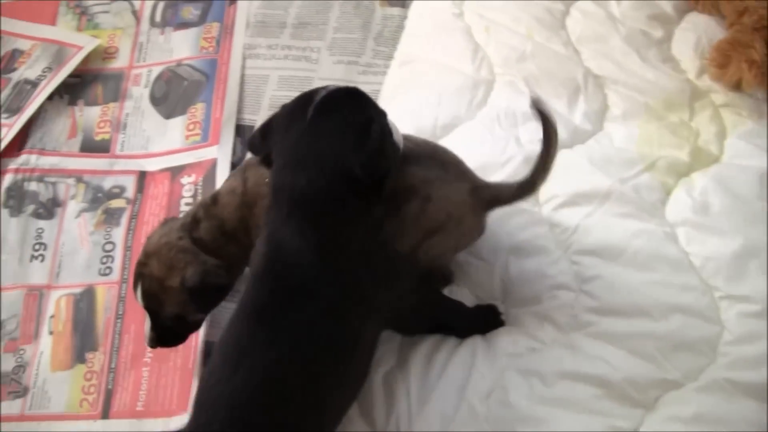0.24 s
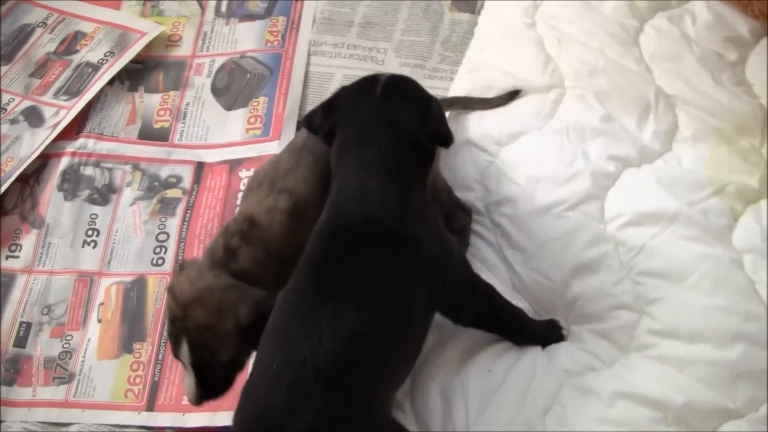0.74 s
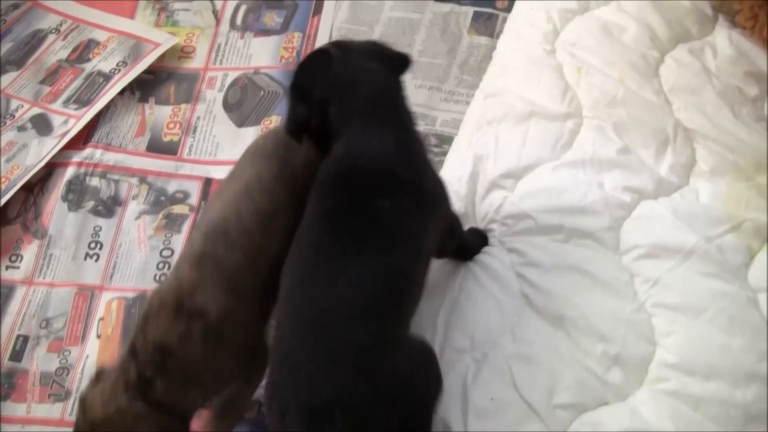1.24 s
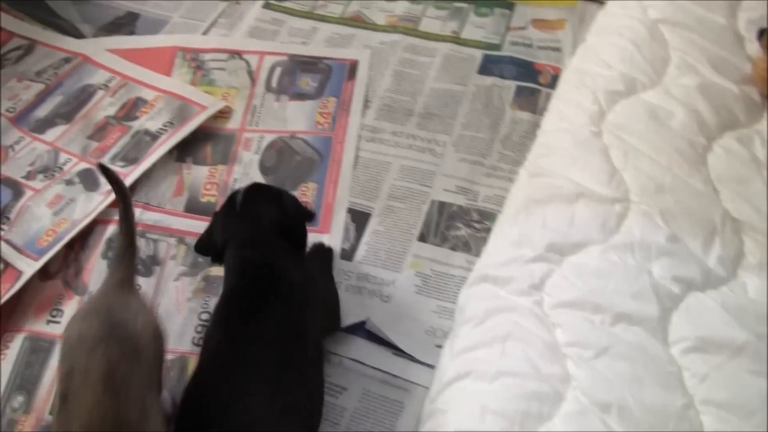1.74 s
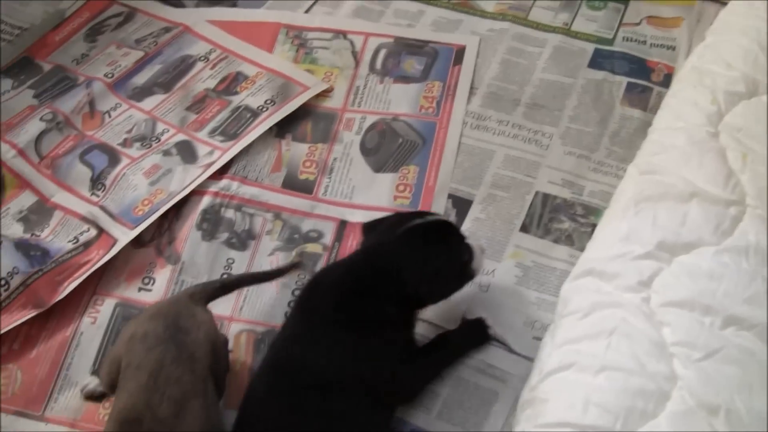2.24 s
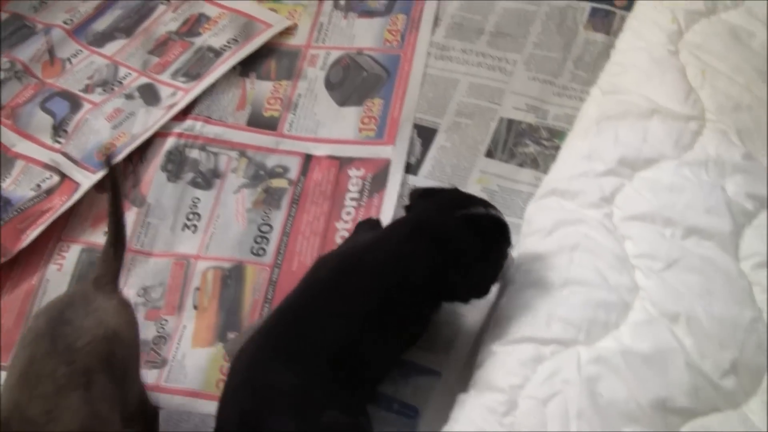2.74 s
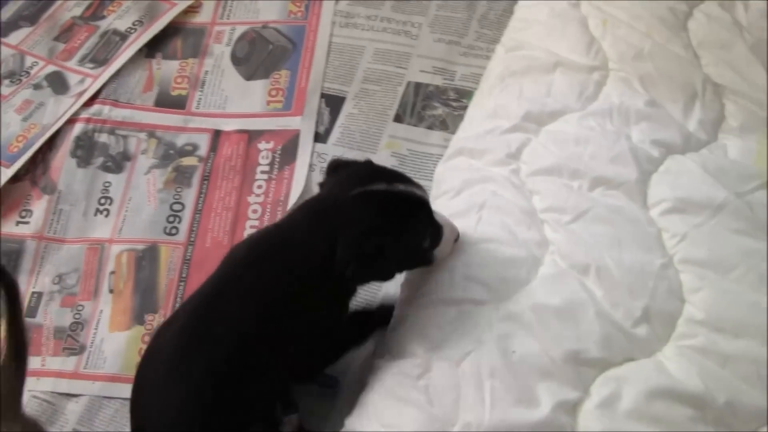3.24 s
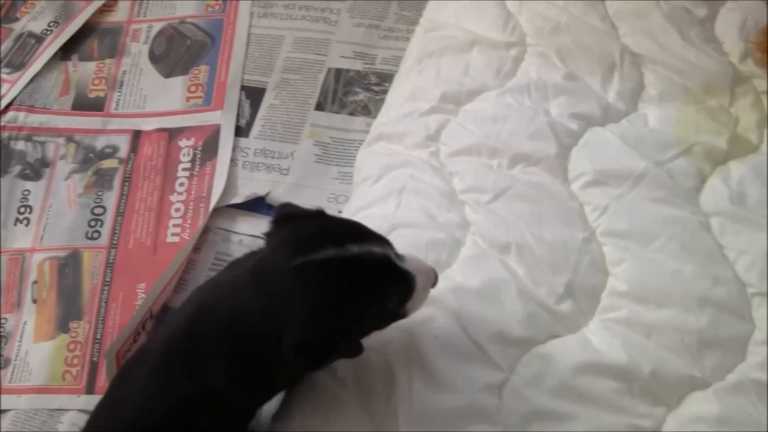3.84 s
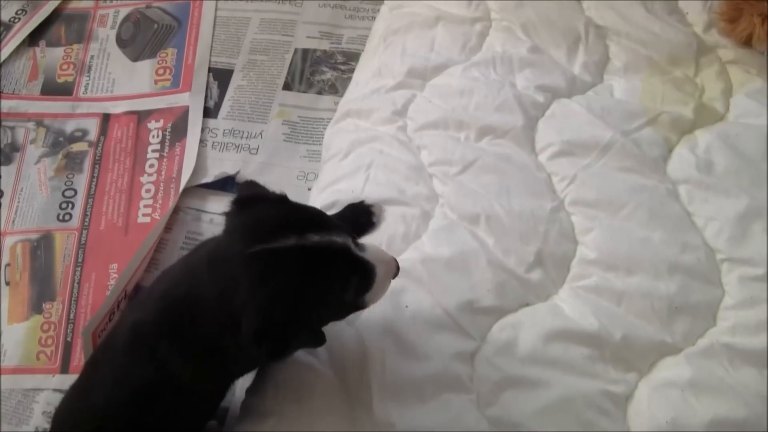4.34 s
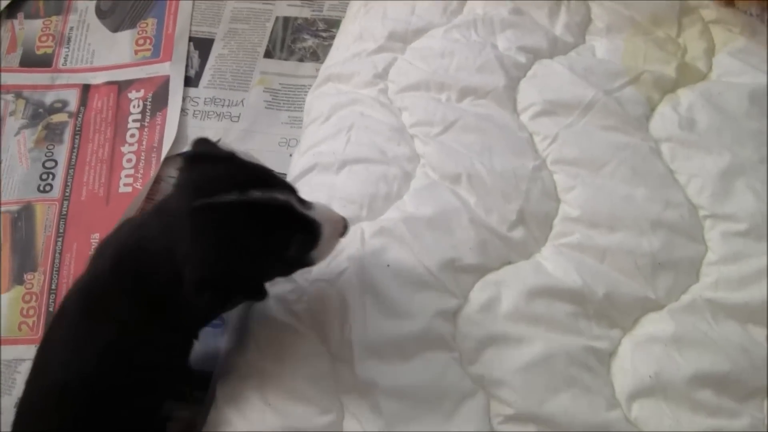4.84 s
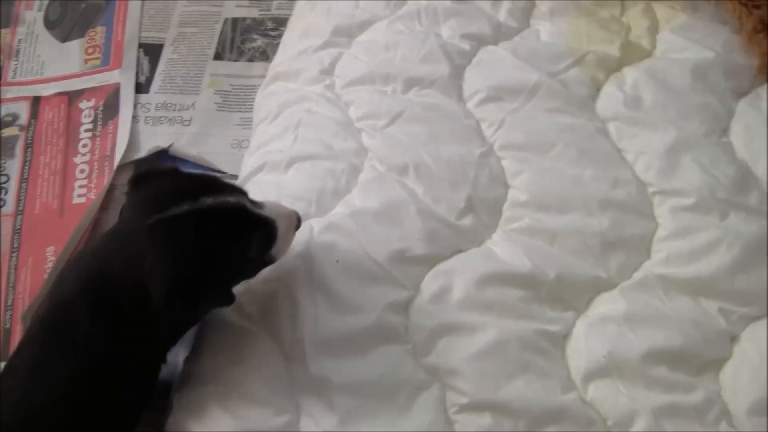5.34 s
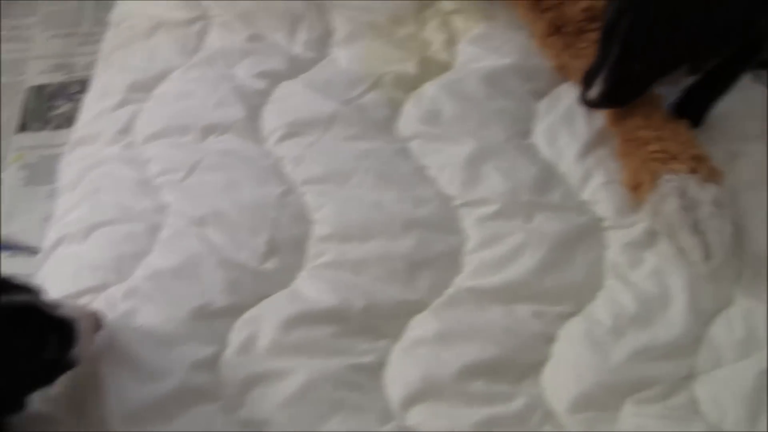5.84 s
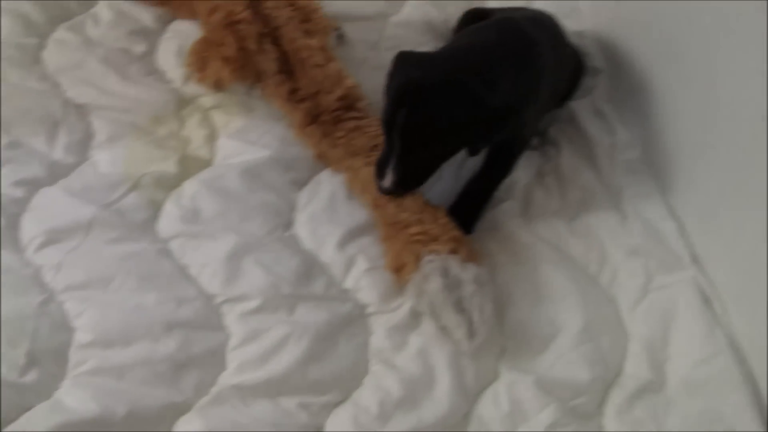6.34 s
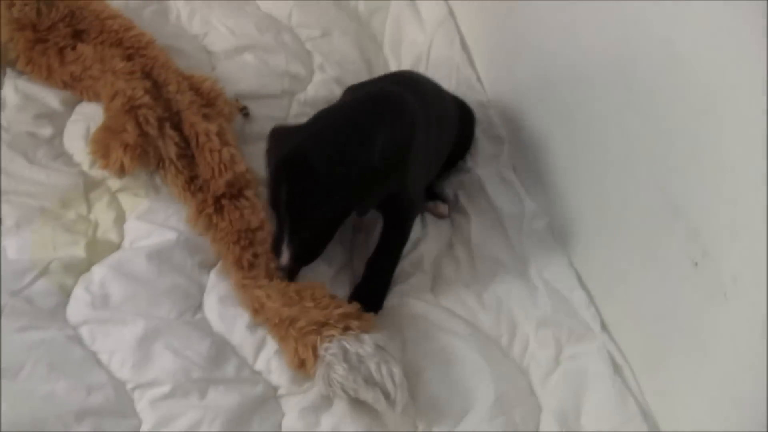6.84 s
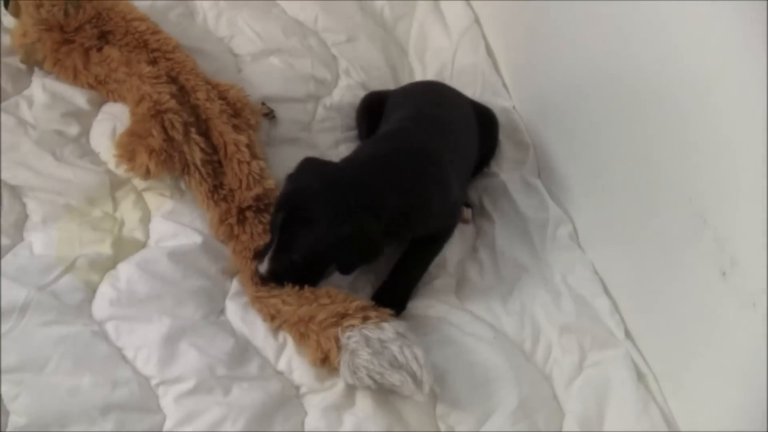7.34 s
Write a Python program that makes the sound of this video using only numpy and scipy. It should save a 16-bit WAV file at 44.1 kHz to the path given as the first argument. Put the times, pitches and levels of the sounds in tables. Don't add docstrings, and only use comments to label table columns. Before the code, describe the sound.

Close crinkling and dragging of newspaper under small paws, a burst of sharp snaps and thuds early, then sparse rustles, taps and pops.

```python
import sys
import numpy as np
from scipy import signal
from scipy.fft import rfft, irfft, next_fast_len
from scipy.io import wavfile
from scipy.ndimage import uniform_filter1d

SR = 44100
rng = np.random.default_rng(int(sys.argv[2]) if len(sys.argv) > 2 else 0)


def generate_wav(sig):
    pcm = np.round(np.clip(np.atleast_2d(sig).T, -1, 1) * 32767).astype(np.int16)
    wavfile.write(sys.argv[1], SR, pcm)


def invert_db(level):
    return 10 ** (np.asarray(level, dtype=float) / 20)


N = 334719


def level(x, db):
    return x * invert_db(db) / np.sqrt(np.mean(x ** 2))


def steady(x, shape):
    return x * np.sqrt(np.sum(shape ** 2) / np.sum(x ** 2))


def colour(x, points):
    size = next_fast_len(len(x))
    hz, db = np.transpose(points)
    bin_hz = np.fft.rfftfreq(size, 1 / SR)
    gain = invert_db(np.interp(np.log(bin_hz + 1), np.log(hz), db))
    return irfft(rfft(x, size) * gain, size)[:len(x)]


def resonate(x, hz, q):
    b, a = signal.iirpeak(min(hz, 0.4 * SR), q, fs=SR)
    return signal.lfilter(b, a, x)


def resonate_twice(x, hz, q):
    return resonate(resonate(x, hz, q), hz, q)


def walk(rate_hz):
    hold = int(SR / rate_hz)
    steps = np.repeat(rng.standard_normal(N // hold + 1), hold)
    return 1.2 * uniform_filter1d(steps, hold)[:N]


def add(track, x, time_s):
    paths = rng.standard_normal(256) * np.exp(-np.arange(256) / 60)
    paths /= np.sqrt(np.sum(paths ** 2))
    i = int(time_s * SR)
    track[0, i:i + len(x)] += x[:N - i]
    track[1, i:i + len(x)] += signal.lfilter(paths, [1], x)[:N - i]


def grains(size, per_s, spread_db, smear_s):
    struck = rng.random(size) < per_s / SR
    kicks = struck * invert_db(spread_db * rng.exponential(size=size))
    return signal.lfilter([1], [1, -np.exp(-1 / (smear_s * SR))], kicks)


# (frequency [Hz], density [dB per Hz])
ROOM_MID = [(15, -53), (25, -12), (283, 6), (473, 1.5), (653, 3.5), (1970, -7), (4680, -17), (9690, -16),
            (12000, -19.5), (14200, -8), (15800, -9.5)]
ROOM_SIDE = [(15, -68), (25, -24), (64, -21), (261, 2), (381, 3.5), (527, 2.5), (789, -0.5), (1630, -8.5),
             (4680, -23), (5970, -41), (11100, -20), (13800, -32), (15800, -50)]


def room_noise():
    rows = []
    for points, db in ((ROOM_MID, -48), (ROOM_SIDE, -43)):
        hiss = level(colour(rng.standard_normal(N), points), db)
        rows.append(hiss * invert_db(0.11 * walk(2.44)))
    return np.array(rows)


def walls():
    low_t60_s, high_t60_s, rise_s = 0.36, 0.16, 0.0022
    t = np.arange(SR // 2) / SR
    noise = rng.standard_normal(len(t)) * np.minimum(t / rise_s, 1)
    low = signal.lfilter(*signal.butter(2, 3200, fs=SR), noise)
    tail = low * invert_db(-60 * t / low_t60_s) + (noise - low) * invert_db(-60 * t / high_t60_s)
    return tail / np.sqrt(np.sum(tail ** 2))


# (frequency [Hz], gain [dB])
SHEET = [(250, -12), (520, -2), (760, 2.5), (1100, 1.5), (1600, 2.5), (2500, 1), (3500, -5), (5000, -23),
         (9000, -36.5)]
SCRAPE = [(2000, -20), (3500, -7.5), (5000, -3.5), (7000, -6), (9000, -12.5), (14000, -50)]
FINE = [(4000, -34), (7000, -12), (9000, -4), (11000, -4), (14000, -7.5), (16000, -18)]
PADDING = [(60, -42), (100, -13), (200, 4.5), (350, 11), (550, 1), (900, -11), (2000, -49)]
# (time [s], paper effort [dB], dryness [dB], weight on duvet [dB])
STIRRING = [(0, -46.5, -4.5, -47), (.2, -47, -13.5, -56), (.75, -52.5, -11, -51), (1.24, -53, -2.5, -49),
            (1.47, -45, -4, -45), (1.66, -41, -18, -41), (1.85, -39, -4.5, -75), (2.3, -53, 2.5, -69),
            (2.9, -54, 3, -64), (3.42, -43.5, 1, -58), (3.7, -48.5, -9.5, -59), (4.3, -52, -8, -53),
            (4.6, -56, -18, -54), (5.32, -54.5, -26, -64), (5.8, -62, 2, -54), (6.2, -48, -10, -57.5),
            (7.22, -51.5, -10, -53.5), (7.59, -47, -19, -60)]
# (middle [s], length [s], effort [dB], dryness [dB])
SLIDES = [(0.303, 0.21, -41, -5), (0.613, 0.27, -43, -8.5), (0.966, 0.26, -39.5, -6.5),
          (1.106, 0.063, -31, -14), (1.36, 0.3, -43.5, -5.5), (1.49, 0.092, -37, 10),
          (1.635, 0.074, -34, 1), (1.69, 0.21, -31.5, -4), (1.842, 0.14, -51.5, 16.5),
          (1.995, 0.15, -36.5, -15), (2.116, 0.4, -43.5, -3.5), (2.453, 0.24, -54, -18),
          (2.597, 0.36, -49, -27), (2.807, 0.31, -40.5, -5.5), (3.27, 0.22, -48.5, 12.5),
          (3.323, 0.15, -40, -17), (3.583, 0.18, -56, 14), (3.811, 0.24, -36.5, -4),
          (4.493, 0.23, -49, -4.5), (4.68, 0.15, -45.5, -14), (4.887, 0.43, -48, -3.5),
          (5.176, 0.48, -50, -6.5), (5.468, 0.2, -43.5, -8), (5.61, 0.23, -41, -8.5),
          (5.855, 0.32, -41.5, -11), (6.015, 0.14, -46, -2), (6.394, 0.15, -45.5, -3.5),
          (6.973, 0.21, -43, -7.5), (7.348, 0.23, -50, -1.5), (7.535, 0.1, -45.5, 3.5),
          (0.895, 0.022, -37, -14), (1.302, 0.037, -35, -6), (1.578, .025, -38, 0),
          (1.71, 0.022, -37, 10.5), (6.344, 0.04, -41.5, -2.5), (6.398, .04, -43.5, -2),
          (6.474, 0.018, -44, 10), (6.496, 0.074, -40.5, -2), (6.772, 0.038, -41, -9),
          (3.325, .03, -39.5, -7), (2.747, .02, -49, 9), (4.148, 0.049, -52, 3), (1.146, .04, -41, -5),
          (7.15, .04, -57, -13), (3.624, 0.039, -35, -14)]
# (middle [s], effort [dB], dryness [dB])
NUDGES = [(.03, -60, -13), (.82, -45, -12), (1.17, -43, -12), (3.03, -62, -8), (4.05, -53, -8),
          (4.22, -62, -28), (4.39, -50, -3.5), (5.07, -54, 0), (5.75, -43.5, -29), (6.33, -47, -22),
          (6.58, -43, -25), (6.84, -43.5, -13), (7.1, -46.5, -17)]


def rustle():
    scrape_db, scrape_per_dryness, nudge_s = -1, 0.7, 0.11
    t = np.arange(N) / SR

    def layers_db(effort, dry, weight):
        return np.array([effort, effort + scrape_db + scrape_per_dryness * dry, effort + dry, weight])

    time_s, *controls = np.transpose(STIRRING)
    power = invert_db(layers_db(*(np.interp(t, time_s, c) for c in controls))) ** 2
    nudges = [(middle, nudge_s, effort, dry) for middle, effort, dry in NUDGES]
    for middle, length, effort, dry in SLIDES + nudges:
        near = np.abs(t - middle) < length
        swell = np.exp(-(4 * (t[near] - middle) / length) ** 2)
        paper = invert_db(layers_db(effort, dry, 0))[:-1, None]
        power[:-1, near] += paper ** 2 * swell
    slip_db = 0.6 * walk(40)
    gains = [np.sqrt(p) * invert_db(slip_db + walk(30)) for p in power]
    creases = grains(N, per_s=600, spread_db=1.0, smear_s=0.0015)
    rough = 1 + invert_db(-8) * np.minimum(creases / creases.std(), 4)
    rubs = rng.standard_normal((2, N)) * rough
    layers = list(zip(gains, (SHEET, SCRAPE, FINE, PADDING)))
    return np.array([sum(gain * level(colour(rub, shape), 0) for gain, shape in layers) for rub in rubs])


# (time [s], peak [dB], pad pitch [Hz], t60 [s], floor boom [dB])
THUMPS = [(0.115, -32.5, 284, 0.15, -63.5), (0.348, -44, 276, 0.12, -85), (0.647, -35, 339, 0.13, -78),
          (0.909, -35, 257, 0.079, -63.5), (1.507, -27, 355, 0.11, -76), (1.61, -16, 232, 0.063, -47),
          (1.803, -24, 189, 0.19, -43.5), (1.859, -23.5, 346, 0.069, -60), (1.961, -25, 200, 0.033, -40),
          (2.138, -63, 286, 0.087, -66), (3.388, -43, 215, 0.2, -80), (3.624, -35, 380, 0.067, -59.5),
          (3.773, -24.5, 181, 0.14, -53), (4.16, -29, 338, 0.06, -84), (4.729, -42, 280, 0.11, -65),
          (4.794, -38.5, 372, 0.098, -63), (5.437, -36.5, 392, 0.2, -79), (5.983, -42, 250, 0.099, -58),
          (6.533, -35.5, 395, 0.11, -86), (6.987, -28, 306, 0.088, -85), (6.3, -41.5, 327, 0.12, -81),
          (6.42, -43, 349, 0.25, -82), (6.774, -42, 254, 0.11, -77), (7.312, -44.5, 207, 0.5, -89)]


def thumps():
    boom_hz, boom_t60_s = 99, 0.15
    out = np.zeros((2, N))
    t = np.arange(16000) / SR
    for s, db, hz, t60, boom_db in THUMPS:
        fade = (1 - np.exp(-t / 0.00028)) * invert_db(-60 * t / max(t60, 0.02))
        sag_s = invert_db(boom_db + 7) * (1 - np.exp(-t / 0.0253))
        ring = np.sin(2 * np.pi * hz * (t + sag_s))
        noise = rng.standard_normal((2, len(t)))
        slap = level(resonate(resonate(noise[0], 0.59 * hz, 0.63), 1.09 * hz, 1.25), -3)
        rumble = level(resonate_twice(noise[1], 1.4 * boom_hz, 1.6), -9)
        boards = np.sin(2 * np.pi * boom_hz * t) + rumble
        boom = boards * (1 - np.exp(-t / 0.0083)) ** 2 * invert_db(-60 * t / boom_t60_s)
        add(out, invert_db(db - 1.5) * fade * (ring + slap) + invert_db(boom_db + 22) * boom, s)
    return out


# (time [s], peak [dB], pitch [Hz], ring [cycles])
POPS = [
    (2.793, -23, 2600, 12),
    (4.1645, -7.5, 1200, 1.3),
    (5.926, -23.5, 1090, 3.7),
    (6.982, -14, 1080, 2.4),
    (6.988, -13.5, 1140, 2.1),
    (6.993, -16, 1200, 2.6),
    (6.999, -19, 1260, 2.6),
]


def pops():
    out = np.zeros((2, N))
    t = np.arange(1500) / SR
    for s, db, hz, cycles in POPS:
        fade = np.minimum(hz * t, 1) * np.exp(-hz * t / cycles)
        add(out, invert_db(db) * np.sin(2 * np.pi * hz * t) * fade, s)
    return out


# (time [s], peak [dB], pitch [Hz])
TICKS = [(1.1208, -10, 4500), (1.0894, -11, 4080), (1.395, -31, 5240), (2.0143, -24, 4500),
         (2.496, -14, 5700), (2.6445, -29, 3130), (2.7084, -14, 8000), (2.7282, -14, 8700),
         (2.741, -17, 8300), (2.762, -13, 8000), (4.169, -16.5, 1990), (2.9052, -13, 8000),
         (3.535, -25, 3180), (4.0195, -28, 1500), (4.923, -22, 4270), (4.9747, -25, 3500),
         (5.273, -24, 3350), (5.988, -25, 1590), (6.472, -11, 3540), (6.59, -17, 6400), (6.6648, -24, 6620),
         (7.1411, -14.5, 3340), (7.002, -15, 9000)]


def ticks():
    out = np.zeros((2, N))
    t = np.arange(800) / SR
    for s, db, hz in TICKS:
        kick = (t == 0) + 0.12 * rng.standard_normal(len(t)) * np.exp(-t / 0.001)
        click = resonate_twice(kick, hz, 1.2)
        add(out, invert_db(db - 3) * click / np.abs(click).max(), s)
    return out


# (time [s], peak [dB], pitch [Hz], length [s])
PATCHES = [(0.004, -29.5, 1130, 0.019), (0.013, -41, 2130, .03), (0.054, -30.5, 1200, 0.0087),
           (0.114, -31, 2900, 0.0044), (0.285, -31, 1470, 0.013), (0.315, -28, 2440, 0.04),
           (0.532, -28, 1310, 0.016), (0.57, -34, 4800, .025), (0.612, -39, 2000, 0.033),
           (0.673, -36, 4300, .015), (0.894, -27, 2000, .007), (1.455, -26, 725, 0.11),
           (1.563, -21, 2000, 0.01), (1.61, -25, 3700, 0.022), (1.68, -32.5, 780, 0.14),
           (1.782, -22, 2120, .004), (1.799, -23, 2190, 0.0054), (1.8245, -19, 1410, 0.0041),
           (1.84, -26, 2000, 0.0087), (2.651, -31.5, 1870, .008), (2.763, -26.5, 970, 0.0055),
           (2.792, -25, 2000, .006), (2.812, -39, 1200, 0.013), (2.844, -29, 2500, .006),
           (2.861, -34, 2200, .008), (2.98, -33, 1850, .01), (3.251, -32.5, 2230, 0.038),
           (3.287, -34, 2400, 0.022), (3.316, -31, 1510, 0.018), (3.38, -21, 2720, 0.01),
           (3.774, -13, 1370, .005), (4.166, -33, 825, 0.041), (5.102, -30, 1210, 0.0056),
           (5.206, -31, 1800, .005), (5.2262, -25.5, 1700, .006), (5.232, -36, 1910, 0.035),
           (5.44, -29, 1620, 0.011), (5.462, -34, 1350, .006), (5.5382, -25.5, 1900, .004),
           (5.583, -38, 1590, .008), (5.592, -38, 3000, 0.056), (5.685, -31, 690, .008),
           (6.595, -28.5, 2450, 0.017), (6.669, -26.5, 2400, 0.019), (7.011, -22, 1260, 0.012),
           (7.022, -37, 1170, 0.18), (7.112, -30, 1700, 0.0073), (7.115, -33, 1750, 0.0066),
           (7.139, -34, 3320, 0.0052), (2.98, -33, 750, 0.023)]
TAPS = [(0.524, -21, 1300, .003), (0.5366, -19, 1070, .004), (0.653, -37, 458, 0.012),
        (0.769, -39, 2090, .01), (0.797, -37, 2700, .02), (0.881, -24, 1600, .002),
        (0.904, -18, 2370, 0.0041), (1.05, -25.5, 3500, 0.0049), (1.097, -29, 2000, .003),
        (1.112, -20.5, 5000, 0.019), (1.12, -14, 2200, .003), (1.464, -25, 4700, .03),
        (1.958, -26, 2700, 0.013), (2.012, -25, 6500, 0.0063), (2.085, -29, 2100, 0.011),
        (2.166, -28, 3200, .004), (2.231, -34, 900, 0.013), (2.338, -40, 500, 0.0068),
        (2.425, -36, 2700, 0.011), (2.572, -40, 1600, 0.066), (3.546, -30, 3200, .008),
        (3.607, -29.5, 7960, 0.011), (3.781, -26, 6000, .008), (3.89, -31, 2800, .003),
        (3.968, -23, 2180, 0.0062), (4.023, -32, 1420, .004), (4.099, -34, 1190, 0.026),
        (4.168, -27, 7750, 0.0051), (4.543, -33, 1600, 0.0065), (4.733, -33, 1930, .008),
        (4.874, -27, 1060, 0.0093), (4.905, -30, 1800, 0.0097), (4.92, -37, 1000, .025),
        (5.729, -38, 3100, .03), (5.809, -32, 1730, .03), (5.944, -35, 1110, 0.019),
        (6.272, -33, 700, .006), (6.329, -35, 3280, .03), (6.426, -43, 397, 0.037),
        (6.4715, -18, 3080, 0.0064), (6.473, -35, 5200, 0.0053), (6.551, -36, 905, .02),
        (6.59, -25, 6400, 0.0068), (6.591, -27, 3100, 0.009), (6.665, -19.5, 1530, .004),
        (6.666, -28, 6600, .006), (6.688, -37, 2100, .02), (7.51, -34, 6900, 0.018),
        (1.606, -10, 2830, 0.0016), (3.784, -32.5, 397, 0.044)]
MORE_TAPS = [
    (0.34, -19, 1100, .003),
    (1.715, -28, 9000, 0.0046),
    (5.793, -35, 510, 0.016),
    (5.988, -32.5, 520, 0.018),
    (2.7452, -24, 8300, .002),
]


def patches():
    q, kick, rise_share = 3.25, 4.3, 0.14
    out = np.zeros((2, N))
    t = np.arange(8000) / SR
    for s, db, hz, length in PATCHES + TAPS + MORE_TAPS:
        length = max(length, 0.002)
        shape = np.minimum(t / (rise_share * length), 1) * np.exp(-(t / length) ** 2)
        drive = rng.standard_normal(len(t)) * shape + kick * np.exp(-t * 4 * hz)
        add(out, invert_db(db - 7) * steady(resonate_twice(drive, hz, q), shape), s)
    return out


# (frequency [Hz], gain [dB])
HISS = [(1500, -44), (3000, 6.5), (5000, 3.5), (7000, 4), (10000, -1), (12500, -4), (14500, -7),
        (16000, -39)]
# (time [s], peak [dB], sheet pitch [Hz], treble minus peak [dB])
CRACKS = [(0.034, -30.5, 1020, -35), (0.348, -22.5, 1100, 3), (0.526, -22, 1170, -23),
          (0.9, -23.5, 2110, 5.5), (1.03, -27.5, 1060, -1), (1.046, -29, 3550, -1), (1.517, -6, 2080, -3),
          (1.564, -12, 2570, -5), (1.6036, -3, 3080, 0), (1.704, -17.5, 2520, -5), (1.851, -13.5, 1620, -8),
          (1.875, -23, 2550, -14), (2.137, -25.5, 1640, -1.5), (1.5, -11.5, 1800, -5),
          (2.6226, -29, 1630, -21), (2.759, -28, 2000, 0), (2.813, -28.5, 3000, 2.5),
          (2.952, -34, 3480, 4.5), (3.084, -29, 1570, -37), (3.403, -16.5, 2630, -10),
          (3.62, -23, 2210, -11), (3.772, -11.5, 1120, -12), (3.886, -27.5, 1820, -19),
          (3.967, -27.5, 2040, -12), (4.019, -26, 990, -27), (5.102, -30.5, 1290, -1),
          (5.447, -21.5, 1510, -5.5), (5.538, -32, 3000, -6), (5.929, -27.5, 1080, -5),
          (6.59, -31, 2640, -5)]
FLAPS = [(0.115, -38, 575, -5), (0.323, -24.5, 2000, -4), (0.683, -31, 900, -5), (0.998, -43, 2070, -14),
         (1.3, -22, 2030, -2), (1.545, -24, 1950, -10), (1.823, -19.5, 1550, -2.5), (1.961, -17.5, 890, -4),
         (1.971, -19.5, 1340, -1.5), (2.977, -28, 2150, -2), (4.1675, -19.5, 1630, -9.5),
         (1.088, -31, 2200, -13), (1.4555, -17, 2000, -7), (4.73, -28.5, 2000, -4),
         (4.789, -33.5, 2400, -8), (4.874, -33, 1080, -6), (5.222, -35, 1900, 0.5), (5.388, -36, 2800, -9),
         (5.686, -35.5, 620, -21), (6.275, -32, 1120, -16), (6.471, -25, 3050, -0.5),
         (6.534, -26, 1500, -8), (6.664, -25, 2230, 1.5), (7.0, -21.5, 1120, -11), (7.138, -24, 1820, 0),
         (7.292, -35.5, 744, -25), (7.584, -36, 3500, 1), (7.468, -37.5, 1500, 1)]
# same columns, then length [s]
CRUMPLES = [(0.269, -37, 2180, -2, 0.14), (0.283, -24, 2620, -5, 0.024), (0.457, -34, 1660, -13, 0.047),
            (0.609, -32, 1590, -10, 0.061), (1.105, -19.5, 2020, -0.5, 0.027),
            (1.374, -27.5, 920, -1.5, 0.049), (1.455, -26, 820, 6.5, 0.13), (1.803, -26.5, 890, -3, 0.076),
            (3.383, -19.5, 1690, -15, 0.028), (4.085, -32, 1160, -12, 0.042),
            (5.393, -35.5, 840, -12, 0.042), (5.732, -40, 1030, 2.5, 0.024),
            (5.826, -28.5, 1640, -33, 0.049), (5.99, -28.5, 1830, -26, 0.017),
            (6.77, -23, 1870, -8.5, 0.049), (6.98, -25, 1080, -7, 0.046), (7.112, -34, 1460, -2.5, 0.031),
            (7.511, -35.5, 1690, 3.5, 0.044)]


def snaps():
    crack_rise_s, crack_fade_s, flap_rise_s, flap_fade_s = 0.0042, 0.0063, 0.0028, 0.017
    crumple_rise_share = 0.48
    first_click, first_click_s = 0.57, 0.0011
    out = np.zeros((2, N))
    t = np.arange(5000) / SR
    buckles = [(*row, crack_rise_s, crack_fade_s) for row in CRACKS]
    buckles += [(*row, flap_rise_s, flap_fade_s) for row in FLAPS]
    for *row, length in CRUMPLES:
        buckles.append((*row, crumple_rise_share * length, (1 - crumple_rise_share) * length))
    for s, db, hz, treble_db, rise, fade in buckles:
        attack = np.minimum(t / max(rise, 0.0003), 1) ** 0.3
        shape = attack * np.exp(-np.maximum(t - rise, 0) / max(fade, 0.001))
        noise = rng.standard_normal((2, len(t)))
        clicks = np.minimum(grains(len(t), per_s=900, spread_db=1.2, smear_s=0.0004), 1.3)
        train = shape * noise[0] * (0.6 + clicks)
        train = train + first_click * noise[0] * np.exp(-t / first_click_s)
        muffled_db = max(-treble_db, 0)
        patch = level(resonate_twice(train, hz, 0.51 + 0.02 * muffled_db), 0)
        whole_sheet = level(colour(train, SHEET), 5.5 - 0.2 * muffled_db)
        ring = steady(patch + whole_sheet, shape)
        crackle = steady(colour(noise[1], HISS) * shape ** 1.3, shape)
        add(out, invert_db(db - 7) * (ring + invert_db(treble_db) * crackle), s)
    return out


# (frequency [Hz], side minus mid [dB])
PORTS = [(60, -18), (110, -40), (200, -25), (380, -46), (700, -14), (1290, -16), (2380, -11.5), (4400, -7),
         (8120, -5.5), (15000, 8.5)]


def scene():
    wall_db = -9
    air = room_noise()
    hits = thumps() + pops() + ticks() + patches() + snaps()
    echoes = [invert_db(wall_db) * signal.fftconvolve(hits[0], walls())[:N] for _ in range(2)]
    near = hits + rustle() + echoes
    mid = near[0] + air[0]
    side = colour(near[1], PORTS) + 0.012 * near[0] + 0.2 * np.gradient(near[0]) + air[1]
    return np.array([mid + side, mid - side])


# (frequency [Hz], gain [dB])
MIC = [(30, -11), (62, -9), (90, -3), (10000, -1.5), (12500, -7.5), (15000, -22)]
MIC_TOP = [(15000, 0), (15500, -2), (15850, -6), (16100, -60)]


def top_cut(x):
    return signal.sosfilt(signal.butter(12, 15850, fs=SR, output="sos"), x)


def record(dry):
    mix = np.array([colour(np.tanh(colour(x, MIC)), MIC_TOP) for x in dry])
    return top_cut(mix)


dry = scene()
out = record(dry)
generate_wav(out)
```